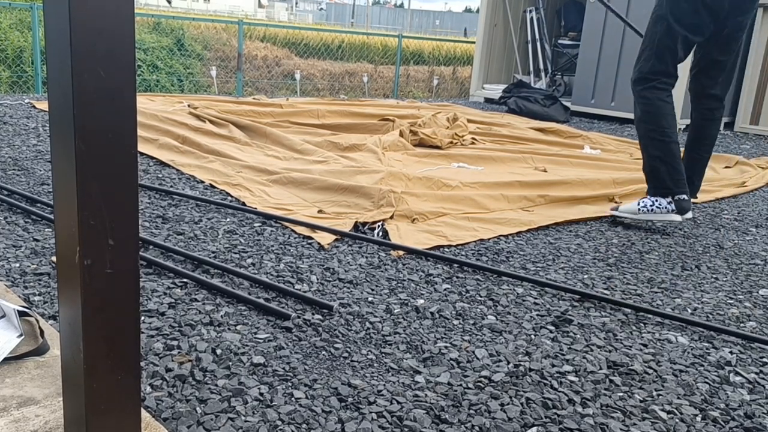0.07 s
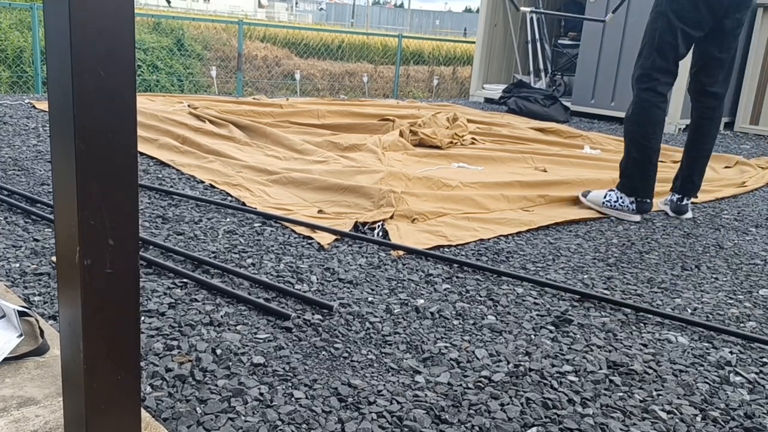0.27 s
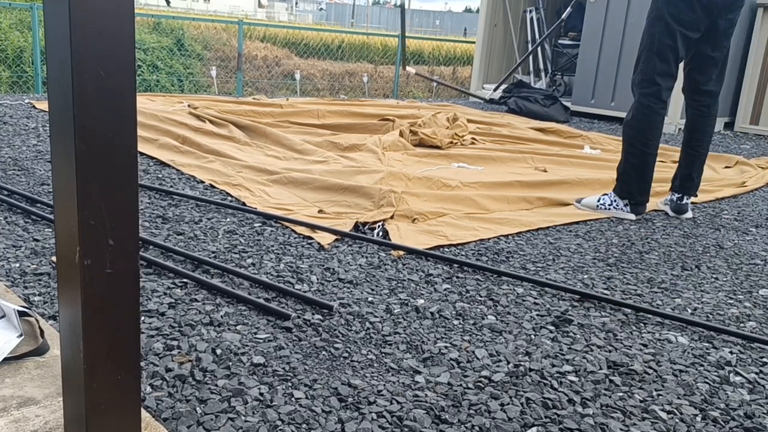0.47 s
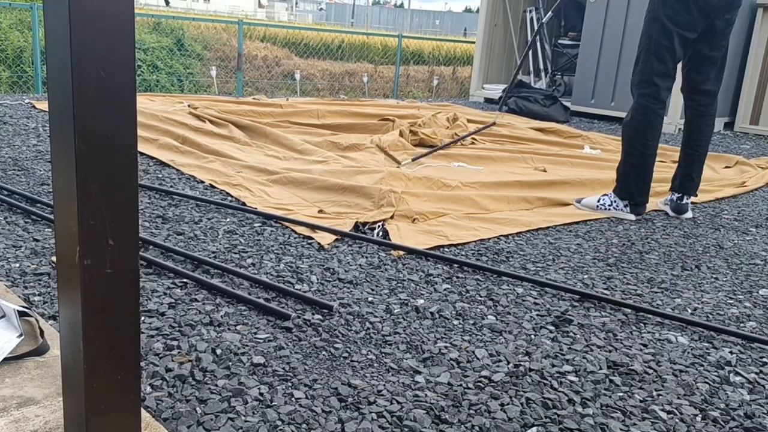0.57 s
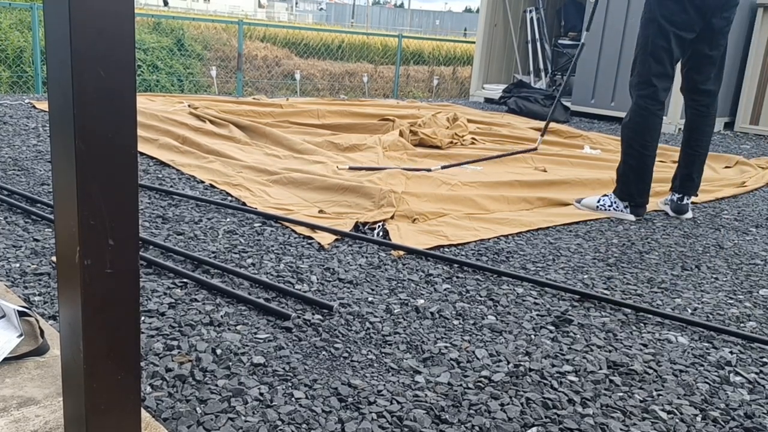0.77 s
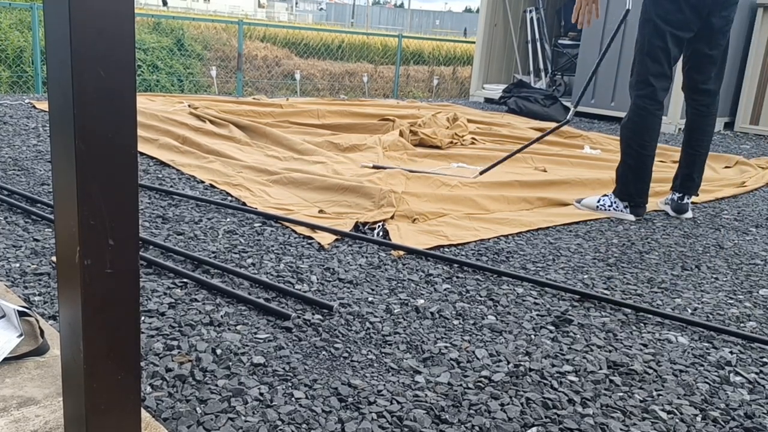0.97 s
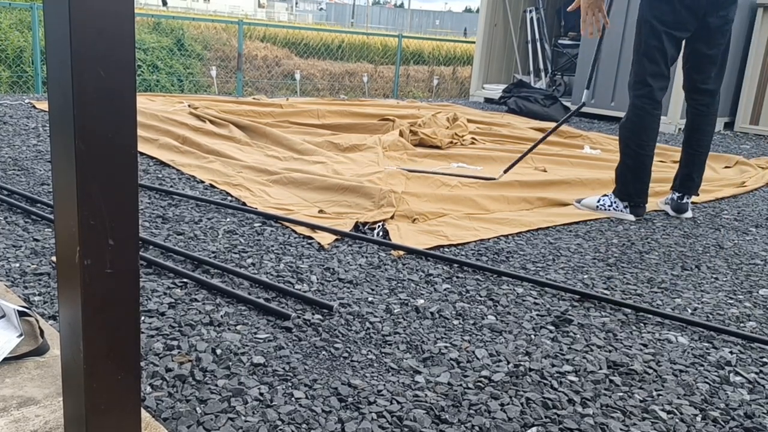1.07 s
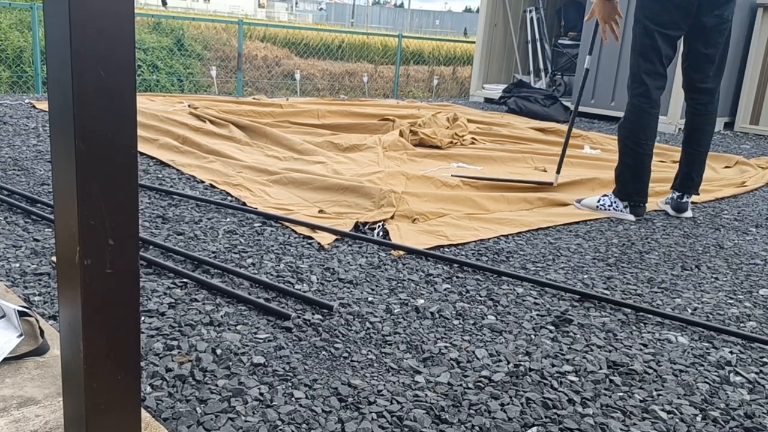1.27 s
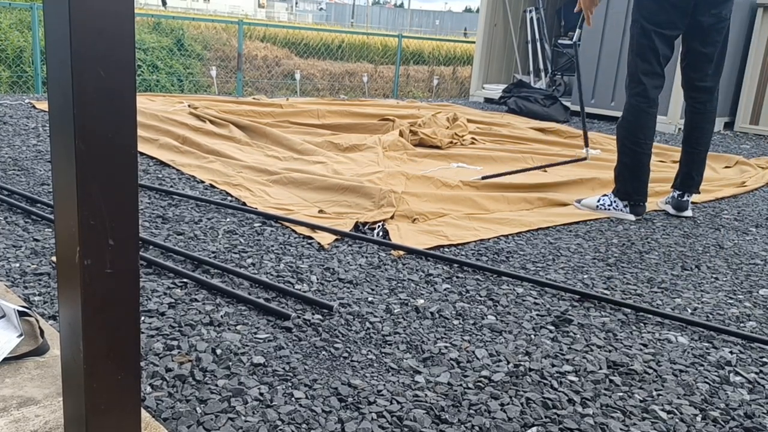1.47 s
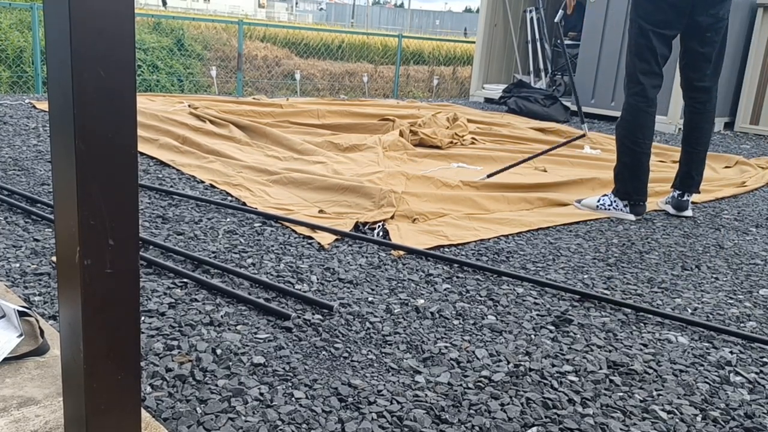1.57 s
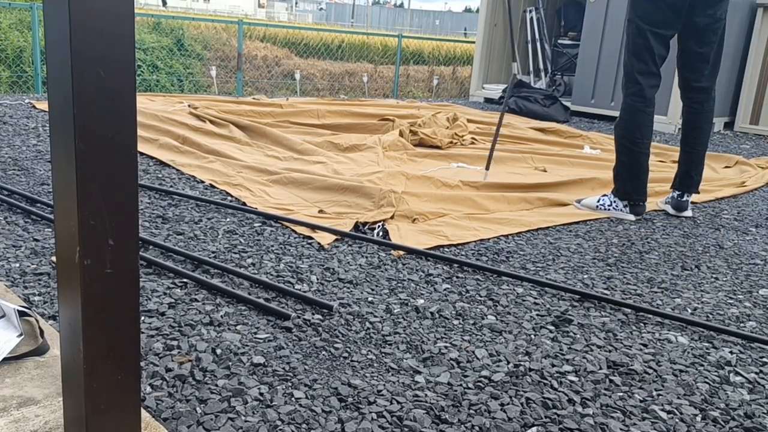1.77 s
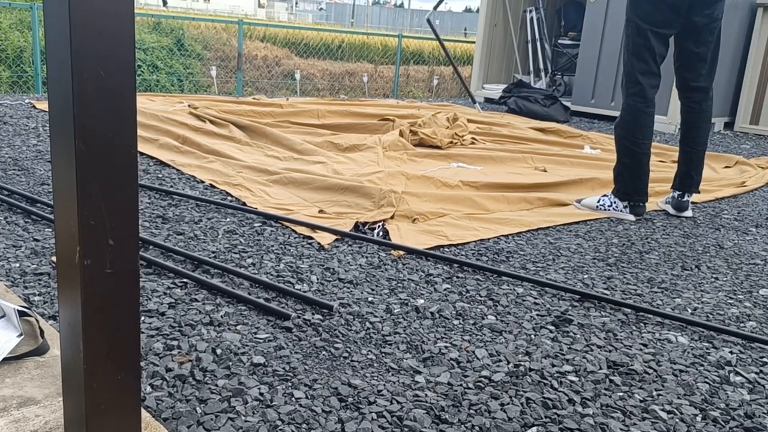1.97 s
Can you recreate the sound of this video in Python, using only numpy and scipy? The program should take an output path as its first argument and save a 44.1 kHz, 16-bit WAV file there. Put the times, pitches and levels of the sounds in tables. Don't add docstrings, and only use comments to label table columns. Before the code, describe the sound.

Bright, dry clacks of hollow tent poles, a tight loud cluster with a canvas thud, then sparse knocks; short reflections from a shed, faint machine hum, hiss and low wind bumps on the left.

```python
import sys
import numpy as np
from scipy import signal
from scipy.io import wavfile

SR = 44100
rng = np.random.default_rng(int(sys.argv[2]) if len(sys.argv) > 2 else 0)


def undo_db(level):
    steps = np.asarray(level, float) / 20
    return 10 ** steps


def persist_wave(psi):
    counts = np.round(np.clip(psi, -1, 1) * 32767).astype(np.int16)
    wavfile.write(sys.argv[1], SR, np.atleast_2d(counts).T)


N = 88200


def at_hz(points, hz):
    points_hz, values = np.transpose(points)
    return np.interp(np.log(hz), np.log(points_hz), values)


def rms_one(x):
    return x / np.sqrt(np.mean(x ** 2) + 1e-20)


def band(x, low_hz, high_hz, order=2):
    sos = signal.butter(order, [low_hz, high_hz], "band", fs=SR, output="sos")
    return signal.sosfilt(sos, x + 1e-18)


def ring(x, hz, width_hz):
    radius = np.exp(-np.pi * width_hz / SR)
    angle = 2 * np.pi * hz / SR
    return signal.lfilter([0, np.sin(angle)], [1, -2 * radius * np.cos(angle), radius ** 2], x + 1e-18)


def noise_bank(size, gain, alike):
    edges_hz = 25 * 2 ** np.arange(0, 9.6, 0.5)
    white = rng.standard_normal((2, 2, size))
    out = 0
    for k, (low_hz, high_hz) in enumerate(zip(edges_hz, edges_hz[1:])):
        mid, side = band(white[k % 2], low_hz, high_hz)
        hz = np.sqrt(low_hz * high_hz)
        likeness = np.clip(alike(hz), -1, 1)
        stereo = np.sqrt(1 + likeness) * mid + np.sqrt(1 - likeness) * side * [[1], [-1]]
        out = out + gain(hz) * stereo
    return out


def poles():
    knock_s = [.002, .0164, .0328, .1922, .199, .3719, .4853, .5352, .5806, .5993, .6205, .630, .8545,
               .9936, 1.259, 1.3733, 1.4242, 1.4511, 1.4699, 1.5983, 1.6267, 1.6581, 1.885, 1.955]
    # peak level in dB, rattle length in s, dull part in dB, ringing part in dB, focus in Hz
    knocks = [(-49.5, 0.016, 6, 4, 1215), (-47, 0.032, -4, 3.5, 850), (-45, 0.016, 4.5, 2.5, 2400),
              (-15, 0.002, -5.5, -3.5, 3500), (-18.5, 0.018, 0.5, -11.5, 6600),
              (-20, 0.0013, 4, -3.5, 3300), (-40.5, 0.022, 10, -2.5, 11000),
              (-31.5, 0.0061, 10.5, -8.5, 10000), (-8.5, 0.0038, -1, -6.5, 15000),
              (-8, 0.004, 4.5, -1, 8300), (-10.5, 0.014, 4, -11, 6800), (-12, 0.003, -16, -8, 1215),
              (-48.5, 0.0013, 11, -5.5, 2500), (-46.5, .02, -3.5, -5.5, 6000), (-47, 0.028, -0.5, -1, 9700),
              (-57.5, .005, 1.5, 8, 8850), (-56.5, 0.0026, 5, 6.5, 2130), (-39, 0.0033, -4, 5.5, 2600),
              (-12.5, 0.0042, -2.5, -10.5, 3200), (-43, 0.0031, 15.5, -2.5, 1215),
              (-29, 0.0073, 8, -3.5, 2060), (-22.5, 0.0067, -2, -4.5, 6300), (-52, 0.023, -7, 5, 1930),
              (-60.5, .004, 10, 4, 1700)]
    tube_hz = np.array([1215, 2150, 2300, 2720, 3400, 3700, 4660, 5135, 5380, 7035, 7115, 8170, 8300, 8450])
    # bandwidth in Hz, level in dB
    tube_modes = [(37.8, -13), (90, -15.5), (70, -5), (80, -9.5), (90, -6), (70, -8.5), (50, -16),
                  (100, -0.5), (70, -10.5), (70, -6), (70, -12), (50, -8), (36.2, -5.5), (70, -6.5)]
    rattle_per_s, rattle_db, rattle_spread_db = 1300, -17, 3
    knock_db, strike_spread_db, low_modes_hz = 8, 2.5, 4000
    focus_gain_db, focus_octaves = 8, 0.19

    bright, dull = np.zeros((2, N + SR))
    modes = np.zeros((len(tube_modes), N + SR))
    t = np.arange(SR // 10) / SR
    for start_s, (peak_db, rattle_s, dull_db, ring_db, focus_hz) in zip(knock_s, knocks):
        chance, polarity = rng.random((2, len(t)))
        excess = np.minimum(rng.exponential(1, len(t)), 4)
        strike_db = rng.normal(0, strike_spread_db, len(tube_modes))
        gate = 1 / (1 + (t / rattle_s) ** 8)
        clicks = (chance < rattle_per_s / SR) * np.sign(polarity - 0.5)
        clicks = clicks * undo_db(rattle_db + rattle_spread_db * excess) * gate
        clicks[0] = 1
        clicks = clicks * undo_db(peak_db + knock_db)

        octaves_off = np.log2(tube_hz / focus_hz)
        focus_db = focus_gain_db * np.exp(-(octaves_off / focus_octaves) ** 2)
        mode_db = ring_db + strike_db + dull_db * (tube_hz < low_modes_hz) + focus_db
        start = int(start_s * SR)
        at = slice(start, start + len(t))
        bright[at] += clicks
        dull[at] += clicks * undo_db(dull_db)
        modes[:, at] += clicks * undo_db(mode_db)[:, None]

    rings = sum(undo_db(level_db - 23) * ring(drive, hz, width_hz)
                for drive, hz, (width_hz, level_db) in zip(modes, tube_hz, tube_modes))
    bright_clack = band(bright, 8500, 16500, order=3)
    dull_clack = band(dull, 1500, 5070, order=3)
    return (bright_clack + dull_clack + rings)[:N]


def snaps():
    snap_s = [
        .3729,
        .6008,
    ]
    snap_db = [
        10,
        15,
    ]
    left_db, body_db, echo_db, echo_t60_s = -6, -12.5, 0, 0.1

    clicks = np.zeros(N)
    for start_s, level_db in zip(snap_s, snap_db):
        clicks[int(start_s * SR)] = -undo_db(level_db)
    click = band(clicks, 10060, 14200) + undo_db(body_db) * band(clicks, 3300, 4900)

    t = np.arange(SR // 8) / SR
    decay = undo_db(-60 * t / echo_t60_s) * (t > 0.0008)
    echoes = rms_one(rng.standard_normal((2, len(t))) * decay) / np.sqrt(len(t))
    echoed = signal.fftconvolve(click[None], echoes, axes=1)[:, :N]
    return click * undo_db(np.array([[left_db], [0]])) + undo_db(echo_db) * echoed


def thuds():
    # start in seconds, peak level in dB, pitch in Hz, 60 dB decay in s
    contacts = [
        (.571, -23.5, 432, 0.027),
        (.585, -32, 300, 0.098),
        (.607, -21.5, 417, 0.041),
        (0.611, -35, 163.2, 0.063),
        (.632, -31.5, 300, 0.039),
        (.6, -28, 607, 0.039),
    ]
    rise_s = 0.00067
    t = np.arange(N) / SR
    out = np.zeros(N)
    for start_s, peak_db, hz, ring_s in contacts:
        age_s = np.maximum(t - start_s, 0)
        envelope = (1 - np.exp(-age_s / rise_s)) * undo_db(-60 * age_s / ring_s)
        out += undo_db(peak_db) * np.sin(2 * np.pi * hz * age_s) * envelope
    return out


def yard(x):
    moves_s = [0, .19, .37, .533, .598, .619, .85, 1.25, 1.468, 1.596, 1.656, 1.88]
    # frequency in Hz, 60 dB decay in s
    yard_t60 = [(300, 0.38), (1500, 0.32), (5000, 0.3), (15000, 0.26)]
    # frequency in Hz, left-right likeness 0..1
    yard_alike = [(300, 1), (700, .6), (2000, 0.077), (12000, 0.25)]
    level_db, rise_s = 8.5, 0.00068

    t = np.arange(SR // 3) / SR
    out = np.zeros((2, N + SR))
    cuts = [int(s * SR) for s in moves_s] + [N]
    for start, end in zip(cuts, cuts[1:]):
        tail = noise_bank(len(t), lambda hz: undo_db(-60 * t / at_hz(yard_t60, hz)),
                          lambda hz: at_hz(yard_alike, hz))
        tail = rms_one(tail * (1 - np.exp(-t / rise_s))) / np.sqrt(len(t))
        out[:, start:end + len(t) - 1] += signal.fftconvolve(x[None, start:end], tail, axes=1)
    return undo_db(level_db) * out[:, :N]


def wind():
    # centre in seconds, peak level in dB, pitch in Hz, length in s
    buffets = [
        (0.055, -31, 111, 0.0098),
        (0.188, -39, 80, 0.0061),
        (0.22, -18, 105.6, 0.0054),
        (0.246, -29, 65, 0.023),
        (0.292, -32, 78, 0.024),
        (0.319, -28, 115, 0.007),
        (.342, -36, 70, 0.012),
        (0.44, -40, 90, 0.015),
        (0.568, -46, 75, 0.025),
    ]
    right_db = -23.5
    t = np.arange(N) / SR
    left = np.zeros(N)
    for centre_s, peak_db, hz, length_s in buffets:
        age_s = t - centre_s
        left += undo_db(peak_db) * np.cos(2 * np.pi * hz * age_s) * np.exp(-(age_s / length_s) ** 2)
    return left * undo_db(np.array([[0], [right_db]]))


def hum():
    # frequency in Hz, level in dB
    orders = [(155, -62.5), (232, -65.5), (270, -66), (310, -69), (388, -60)]
    halo_width_hz, level_db, steady_db = 3, -2.5, 2
    t = np.arange(N) / SR
    out = np.zeros(N)
    for hz, order_db in orders:
        white = rng.standard_normal(N + SR)
        halo = rms_one(ring(white, hz, halo_width_hz)[SR:])
        tone = undo_db(steady_db) * np.sin(2 * np.pi * hz * t)
        out += undo_db(order_db + level_db) * (halo + tone)
    return out


def air():
    # frequency in Hz, relative density in dB per Hz
    floor_db = [(18, -53.5), (30, 11.5), (145, 1), (189, -28.5), (233, 3), (540, -10.5), (649, -21.5),
                (913, -19), (16000, -35)]
    # frequency in Hz, left-right likeness 0..1
    floor_alike = [(60, 0.088), (240, 0.84), (950, 0.23), (3770, 0.01), (15000, 0.03)]
    # time in seconds, level in dB
    breeze_points = [(0, -3.5), (.13, 7.5), (.5, 7), (.65, -12.5), (.87, -4), (1.1, 0.5), (1.3, -1),
                     (1.45, -14), (1.6, -8), (1.7, -5.5), (2, -1.5)]
    level_db, breeze_top_hz, settle = -50, 120, 4000
    breeze_db = np.interp(np.arange(-settle, N) / SR, *np.transpose(breeze_points))
    bands = noise_bank(N + settle, lambda hz: undo_db(at_hz(floor_db, hz) + breeze_db * (hz < breeze_top_hz)),
                       lambda hz: at_hz(floor_alike, hz))
    return undo_db(level_db) * rms_one(bands[:, settle:])


def scene():
    pan_db, left_lag, thud_room_db = 2, 5, -8
    metal, thud = poles(), thuds()
    heard = metal + thud + yard(metal + undo_db(thud_room_db) * thud)
    heard = heard * undo_db(np.array([[-pan_db / 2], [pan_db / 2]])) + snaps()
    n = np.arange(N)
    heard[0] = np.interp(n - left_lag, n, heard[0])
    return heard + hum() + air() + wind()


def roll_off(x):
    return signal.sosfilt(signal.butter(12, 16800, fs=SR, output="sos"), x)


def record(dry):
    # frequency in Hz, width in Hz
    mic_dips = [(6200, 320), (7700, 100)]
    low_hz, top_hz, full_scale = 70, 15750, 1.5
    x = signal.sosfilt(signal.butter(3, low_hz, "high", fs=SR, output="sos"), dry)
    x = full_scale * np.tanh(x / full_scale)
    x = signal.sosfilt(signal.ellip(8, 0.5, 45, top_hz, fs=SR, output="sos"), x)
    for hz, width_hz in mic_dips:
        x = signal.lfilter(*signal.iirnotch(hz, hz / width_hz, SR), x)
    return roll_off(x)


dry = scene()
out = record(dry)
persist_wave(out)
```